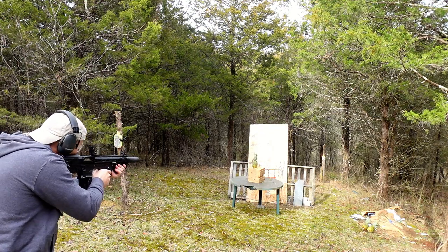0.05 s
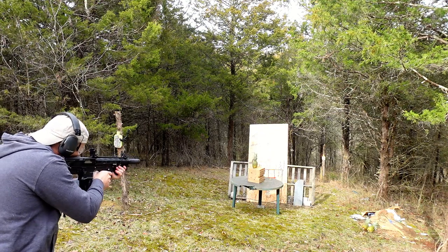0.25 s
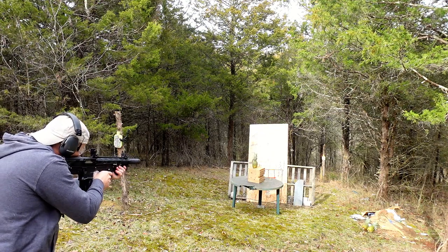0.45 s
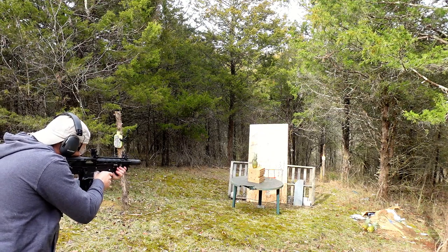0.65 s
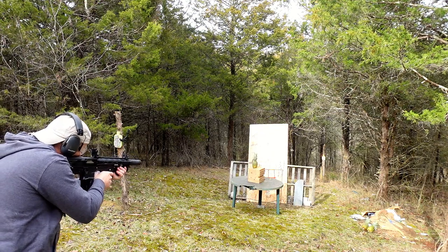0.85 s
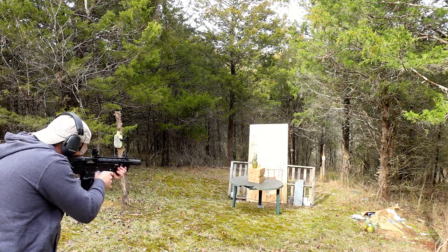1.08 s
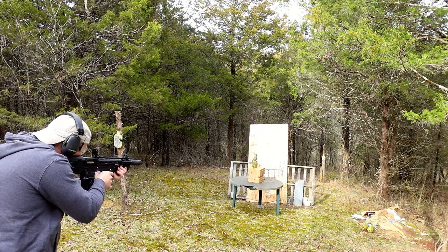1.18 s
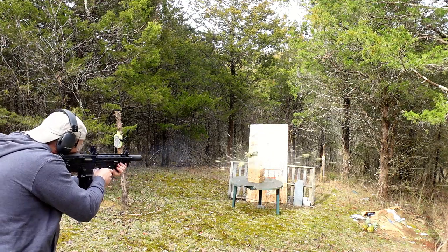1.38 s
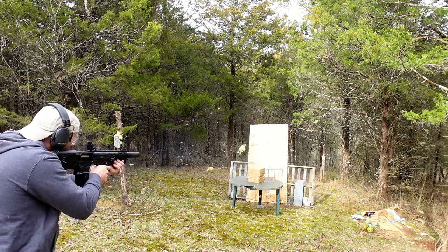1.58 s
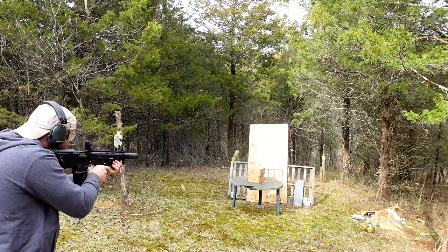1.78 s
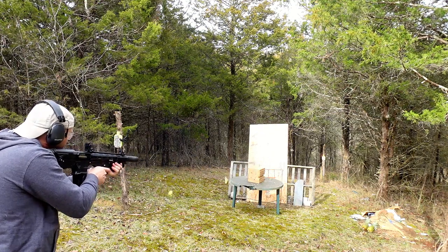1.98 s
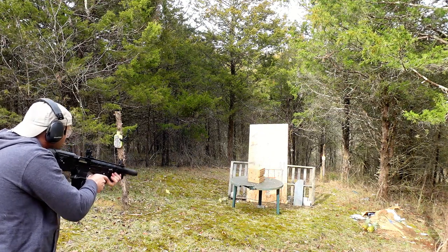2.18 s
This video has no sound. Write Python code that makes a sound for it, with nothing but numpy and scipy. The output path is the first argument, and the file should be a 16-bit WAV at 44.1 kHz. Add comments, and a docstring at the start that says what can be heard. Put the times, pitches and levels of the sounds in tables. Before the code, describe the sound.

A single gunshot at about 1.34 seconds, close and clipped at the microphone. Before it, quiet outdoor air, a faint distant motor hum and tiny handling clicks near 0.25 and 0.98, then trigger clicks at 1.3. Ground slaps and metallic action clacks follow by 1.42 and 1.55, while a dense, darkening woodland echo rolls away past 2 seconds, with faint debris crackling in leaves from 1.6.

```python
"""In a forest clearing, a shotgun is fired a few steps from a camera: trigger, hammer, then the blast.
The blast is a crack of noise, a push of pressure and a long suction, which pin the microphone at its limit.
Scattered noise makes the echoes that swell and roll away into the woods.
Gun clicks and landing debris are short bursts of noise; a far motor is a stack of drifting tones."""
import sys
import numpy as np
from scipy import signal
from scipy.fft import rfft, irfft, next_fast_len
from scipy.io import wavfile
from scipy.ndimage import map_coordinates

SR = 44100
rng = np.random.default_rng(int(sys.argv[2]) if len(sys.argv) > 2 else 0)


def wav_record(signal):
    """Record a signal, one row per channel, as 16-bit PCM in the file named by sys.argv[1]."""
    frames = np.transpose(np.atleast_2d(signal))
    bounded = np.clip(frames, -1, 1)
    # unit amplitude maps onto the largest positive 16-bit level
    quanta = np.round(bounded * 32767).astype(np.int16)
    wavfile.write(sys.argv[1], SR, quanta)


N = 98387  # length of the scene in samples

# Tone of dull clicks, used for the gun's handling and the leaves: (frequency [Hz], relative level [dB])
CLICK_COLOUR = [(300, -20), (900, -8), (2200, -6), (3050, 1), (4200, -5), (4900, -24), (9000, -27),
                (15000, -42)]


def amp(db):
    """Turn decibels into a gain."""
    return 10 ** (np.asarray(db) / 20)


def unit(x):
    """Scale a sound to an average (rms) strength of 1."""
    return x / np.sqrt(np.mean(x ** 2) + 1e-20)


def clock():
    """Time of each sample in seconds."""
    return np.arange(N) / SR


def step(age, edge_s):
    """A rounded rise from 0 to 1, halfway up at age 0."""
    return (1 + np.tanh(age / edge_s)) / 2


def wobble(rate):
    """A smooth random curve through `rate` random points a second."""
    points = rng.standard_normal(int(N * rate / SR) + 4)
    return map_coordinates(points, [clock() * rate])


def filtered(x, response):
    """Multiply each frequency of x by the gain that response(hz) gives."""
    m = next_fast_len(N + 8192)  # spare room so the end does not wrap onto the start
    spectrum = rfft(x, m) * response(np.fft.rfftfreq(m, 1 / SR))
    return irfft(spectrum, m)[..., :N]


def coloured(x, colour):
    """Shape the tone of x by (frequency [Hz], relative level [dB]) points, then scale to rms 1."""
    f, db = np.transpose(colour)

    def response(hz):
        return amp(np.interp(np.log(hz + 1), np.log(f + 1), db))

    return unit(filtered(x, response))


def noise(colour):
    """Fresh random noise with the given tone, at rms 1."""
    return coloured(rng.standard_normal(N), colour)


def grains(rate, share):
    """Random spikes, about `rate` a second; `share` is their part of the power, smooth noise the rest."""
    spikes = unit(rng.standard_normal(N) * (rng.random(N) < rate / SR))
    share = np.clip(share, 0, 1)
    return np.sqrt(share) * spikes + np.sqrt(1 - share) * rng.standard_normal(N)


def strikes(rows):
    """Loudness curve of sudden hits; each falls by 60 dB in its own t60 seconds."""
    t = clock()
    return sum((t >= s) * amp(db - 60 * np.abs(t - s) / t60) for s, db, t60 in rows)


def blast():
    """A short crack, then overpressure and a long suction, far beyond the microphone's range."""
    # Tone of the muzzle crack: (frequency [Hz], relative level [dB])
    crack_colour = [(100, -26), (500, -12), (850, 0), (1600, 0), (2300, -5), (3000, -1), (3700, 2.5),
                    (4600, -9), (9000, -18), (15000, -16)]
    shot_s, crack_s, crack_db = 1.3414, .0044, 3.5  # start, length, level
    push_end_s, push_db = .0069, 8  # overpressure: its end after the shot, level
    turn_s = .0007  # softness of the turn into suction
    suction_db, suction_fade_s = 17, .029

    age = clock() - shot_s
    crack = amp(crack_db) * noise(crack_colour) * ((age >= 0) & (age < crack_s))
    turn = step(age - push_end_s - turn_s / 2, turn_s)
    suction = amp(suction_db) * np.exp(-np.abs(age - push_end_s) / suction_fade_s)
    # The push points down in the wave, the suction up.
    pressure = turn * suction - (1 - turn) * amp(push_db)
    return crack + (age >= crack_s) * pressure


def slaps():
    """The ground and nearby objects reflect the shot, each as one brief shove of pressure."""
    # First reflections: (time [s], level [dB], length [s])
    reflections = [(1.3921, 10, .0013), (1.3948, 10, .0016), (1.4035, 3, .0005), (1.4356, 1, .0008),
                   (1.4642, -3, .0007)]
    edge_s = .00007
    t = clock()
    total = 0
    for s, db, length in reflections:
        total = total + amp(db) * step(t - s, edge_s) * step(s + length - t, edge_s)
    return -total


def echo(shape, colour):
    """Countless trunks scatter the shot back: it swells, holds and fades, with extra loss in the treble."""
    start, rise, hold, db, fade, dulling = shape
    age = clock() - start
    wash = coloured(grains(rate=900, share=.5), colour)  # single trunk echoes within a smooth wash

    # Lose treble over time: cut the wash into short slices and turn down their high frequencies.
    hz, t, slices = signal.stft(wash, SR, nperseg=256)
    loss_db = dulling * hz[:, None] / 1000 * np.maximum(t - start - rise, 0)
    wash = signal.istft(slices * amp(-loss_db), SR)[1][:N]

    uneven_db = 1.0 * wobble(50)
    level_db = db - fade * np.maximum(age - rise - hold, 0) + uneven_db
    swell = np.sqrt(np.clip(age / rise, 0, 1))
    return wash * swell * amp(level_db)


def surges():
    """Dense stands of trees throw back short swells, each in a narrow band of pitch."""
    # Strong returns: (peak time [s], spread around it [s], centre frequency [Hz], level [dB])
    returns = [(1.63, .015, 135, -30), (1.775, .016, 480, -29), (1.825, .012, 135, -37),
               (1.9, .018, 140, -35), (1.965, .03, 600, -36), (2.133, .007, 460, -29),
               (2.165, .012, 540, -32)]
    # Tone of each return: (ratio to its centre frequency [-], relative level [dB])
    band = [(.25, -40), (.55, -14), (.8, 0), (1.25, 0), (1.8, -14), (4, -36), (10, -70)]
    total = 0
    for s, spread, centre_hz, db in returns:
        swell = np.exp(-((clock() - s) / spread) ** 2 / 2)
        colour = [(centre_hz * ratio, gain_db) for ratio, gain_db in band]
        total = total + amp(db) * swell * noise(colour)
    return total


def woods():
    """Echoes return from the edge of the clearing, then from ever farther trees."""
    # Echo shapes: (start [s], rise [s], hold [s], level [dB], fade [dB/s], extra treble fade [dB/s per kHz])
    clearing = (1.393, .012, .002, -1, 270, 0)
    near_trees = (1.4, .04, .11, -11, 195, 3)
    deep_woods = (1.45, .1, .03, -20.7, 43, 3.7)
    far_woods = (1.8, .33, .05, -33, 35, 1)
    # Echo tones: (frequency [Hz], relative level [dB])
    clearing_colour = [(40, -28), (120, -10), (350, 2), (800, -3), (1500, -7.5), (2300, -12), (3600, -8),
                       (5000, -19), (9000, -30), (15500, -38)]
    near_colour = [(30, -32), (60, -17), (126, -5), (250, -12), (350, -6), (570, 0), (750, -3),
                   (1050, -9.5), (1450, -8), (2100, -14), (3600, -14), (4700, -26), (7000, -36),
                   (11000, -45), (15500, -58)]
    deep_colour = [(30, -28), (60, -16), (126, -6), (260, -16), (350, -10), (510, -2), (760, -1),
                   (1050, -7), (1410, -6.5), (2160, -13), (3500, -15), (4500, -26), (5700, -36),
                   (15500, -55)]
    far_colour = [(24, -52), (40, -22), (101, -13), (170, -15), (253, -18), (407, 0), (509, -4), (562, -2),
                  (998, -14), (1600, -19), (3390, -30), (4800, -47), (15500, -61)]

    nearer = echo(clearing, clearing_colour) + echo(near_trees, near_colour)
    farther = echo(deep_woods, deep_colour) + echo(far_woods, far_colour)
    return nearer + farther + surges()


def gun():
    """Grip and trigger click dully and ring the gun's body; hammer and bolt clack sharply."""
    # Grip and trigger: (time [s], click level [dB], t60 [s], body level against the click [dB])
    handling = [(.2484, -63, .025, 6), (.9784, -65, .012, -20), (1.2987, -42, .022, -16),
                (1.303, -46, .03, -10)]
    # Hammer and bolt: (time [s], level [dB], t60 [s])
    action = [(1.3335, -16, .014), (1.414, -10, .02), (1.4175, -4.5, .028), (1.5518, -12, .007)]
    # Tones of the gun's body and of its hammer and bolt: (frequency [Hz], relative level [dB])
    body_colour = [(200, -18), (450, -6), (620, 2), (850, -8), (1300, -7), (2500, -25)]
    action_colour = [(200, -22), (1000, -7), (2200, 0), (3400, 1), (5500, -11), (9000, -8), (13000, -13),
                     (16000, -22)]

    clicks = strikes([row[:3] for row in handling]) * noise(CLICK_COLOUR)
    body_rows = [(s, db + body_db, t60) for s, db, t60, body_db in handling]
    body = strikes(body_rows) * noise(body_colour)
    clacks = strikes(action) * noise(action_colour)
    return clicks + body + clacks


def debris():
    """Bits land in dry leaves as small crackling bursts, over a fine patter of spikes."""
    # Landings: (time [s], level [dB], t60 [s])
    landings = [(1.6814, -52, .07), (1.7898, -51, .1), (1.935, -56, .12), (1.9544, -53, .08),
                (1.9769, -51, .05), (2.083, -63, .05), (2.1301, -59, .04), (2.176, -57, .16),
                (2.1954, -57, .18)]
    # Tone of bits hitting leaves: (frequency [Hz], relative level [dB])
    leaf_colour = [(500, -10), (3000, 0), (7000, 0), (11000, -4), (16000, -9)]
    # Fine bits raining down: (start [s], rise [s], level [dB], fade [dB/s])
    fine_bits = (1.6, .12, -66, 30)

    start, rise, db, fade = fine_bits
    age = np.maximum(clock() - start, 0)
    patter_level = np.minimum(age / rise, 1) * amp(db - fade * age)
    patter = patter_level * coloured(grains(rate=250, share=.9), leaf_colour)
    crackle = coloured(grains(rate=900, share=.6), leaf_colour)
    return patter + strikes(landings) * crackle


def background():
    """Still air is soft noise, dry leaves tick at random, and a distant motor hums in drifting tones."""
    # Motor tones: (frequency [Hz], rms level [dB])
    motor_tones = [(100.5, -59), (150.5, -74), (174, -71), (250.5, -71), (325, -78), (424, -85), (502, -80),
                   (629, -87), (803, -89)]
    # Tone of the still air: (frequency [Hz], relative level [dB])
    air_colour = [(15, -8), (35, 0), (65, -3), (103, -5), (153, -13), (250, -17), (372, -27), (505, -26),
                  (700, -29), (1000, -34), (2000, -41), (5000, -49), (15500, -54)]
    air_db, leaf_db = -59, -96
    drift = .48  # how far each tone's phase wanders [radians]

    hum = 0
    for hz, db in motor_tones:
        phase = 2 * np.pi * hz * clock() + drift * wobble(6)
        hum = hum + amp(db) * np.sqrt(2) * np.sin(phase)
    leaves = amp(leaf_db) * coloured(grains(rate=30, share=1), CLICK_COLOUR)
    return hum + leaves + amp(air_db) * noise(air_colour)


def jolt():
    """The blast thumps the camera with a brief low tone, and its overloaded microphone hisses in spells."""
    # Spells of hiss: (start [s], length [s], starting level [dB])
    hiss_spells = [(1.346, .029, -38.5), (1.39, .05, -33)]
    # Tone of the hiss: (frequency [Hz], relative level [dB])
    hiss_colour = [(150, 8), (400, 6), (2000, 0), (6000, -5), (15000, -8)]
    hiss_fade = 250  # dB per second
    thump_s, thump_hz, thump_db, thump_width_s = 1.3712, 52, -10.5, .0052

    t = clock()
    age = t - thump_s
    bump = np.exp(-(age / thump_width_s) ** 2 / 2)
    thump = amp(thump_db) * np.sin(2 * np.pi * thump_hz * age) * bump
    hiss_level = 0
    for s, length, db in hiss_spells:
        during = (t > s) & (t < s + length)
        hiss_level = hiss_level + amp(db - hiss_fade * np.abs(t - s)) * during
    return thump + hiss_level * noise(hiss_colour)


def scene():
    """Add all the sources; both channels get the same sound."""
    mid = blast() + slaps() + woods() + gun() + debris() + background()
    return np.array([mid, mid])


def record(dry):
    """Each capsule saturates at its own limit, gain control ducks, and steady pressure leaks away."""
    limit, limit_spread, knee = 1.0, .032, 6  # a higher knee bends more sharply into the limit
    self_noise_db = -96  # hiss of each capsule before the gain control
    duck, duck_s = 1.35, .009  # strength and reaction time of the gain control
    low_cut_hz, top_hz = 16, 16200

    limits = limit * (1 + limit_spread * np.array([[-1], [1]]))
    x = dry / (1 + np.abs(dry / limits) ** knee) ** (1 / knee)
    x = x + amp(self_noise_db) * rng.standard_normal((2, N))

    # The gain control follows the recent power of both channels together.
    keep = np.exp(-1 / (duck_s * SR))
    power = signal.lfilter([1 - keep], [1, -keep], np.mean(x ** 2, axis=0))
    x = x / (1 + duck * power)

    low_cut = signal.butter(2, low_cut_hz, "high", fs=SR, output="sos")
    x = signal.sosfilt(low_cut, x) + jolt()
    # Clip at full scale, then cut the top treble steeply.
    return filtered(np.clip(x, -1, 1), lambda hz: 1 / (1 + (hz / top_hz) ** 120))


dry = scene()
out = record(dry)
wav_record(out)
```